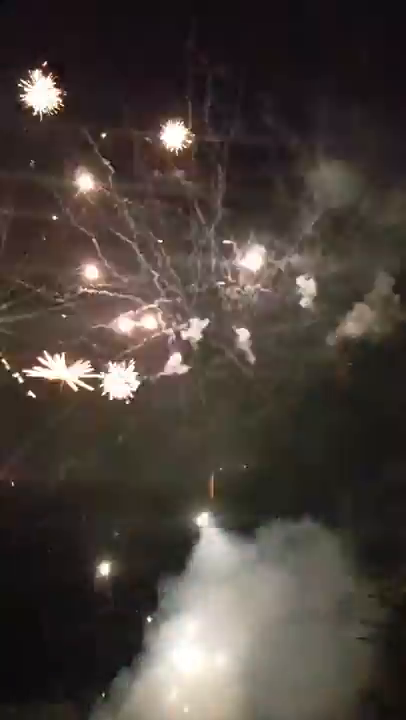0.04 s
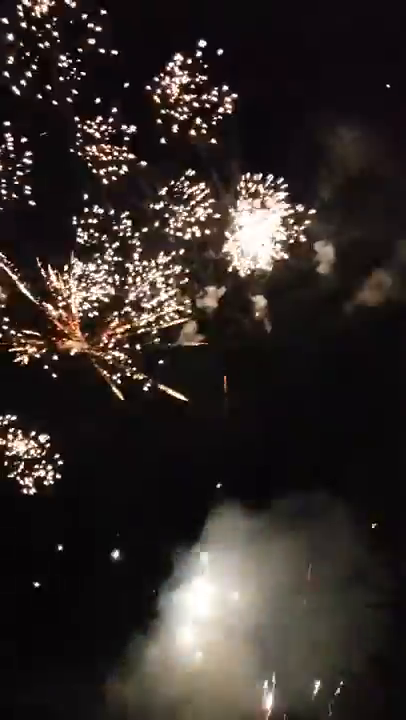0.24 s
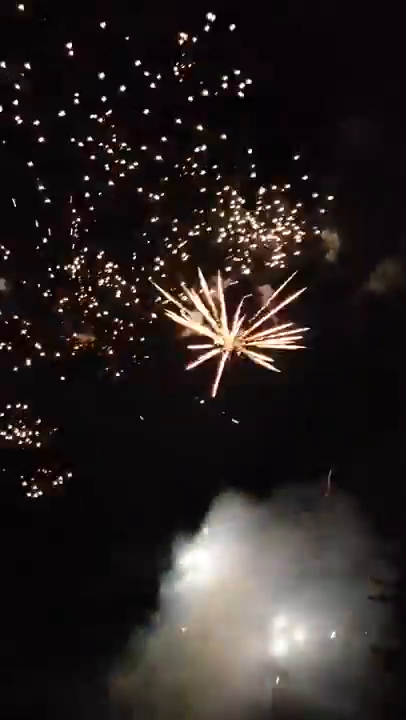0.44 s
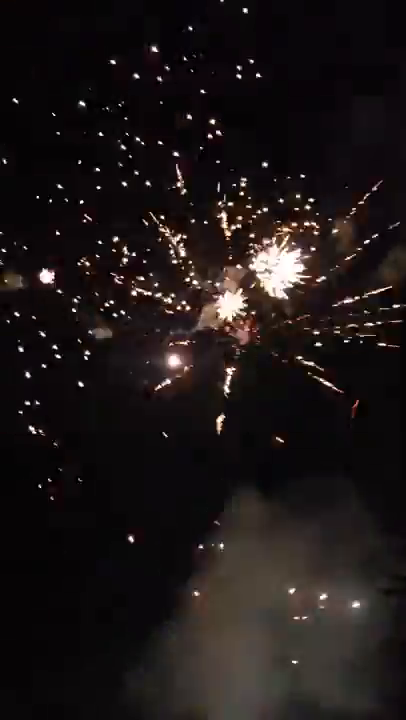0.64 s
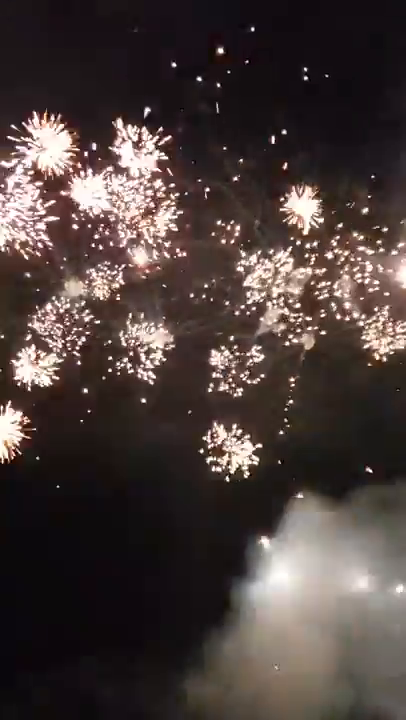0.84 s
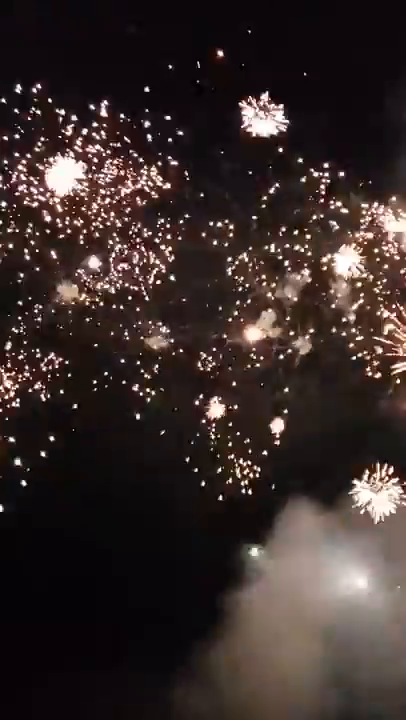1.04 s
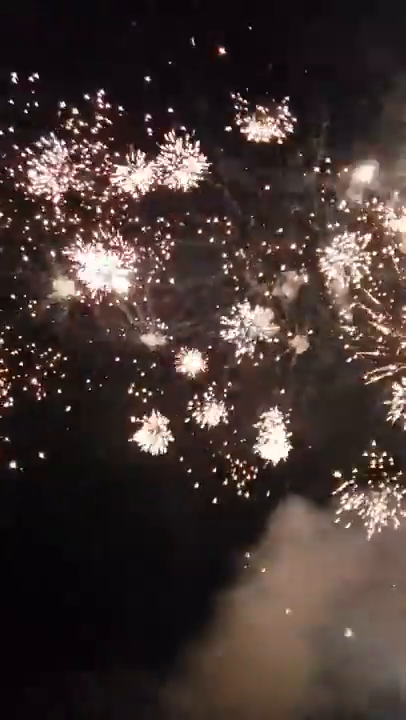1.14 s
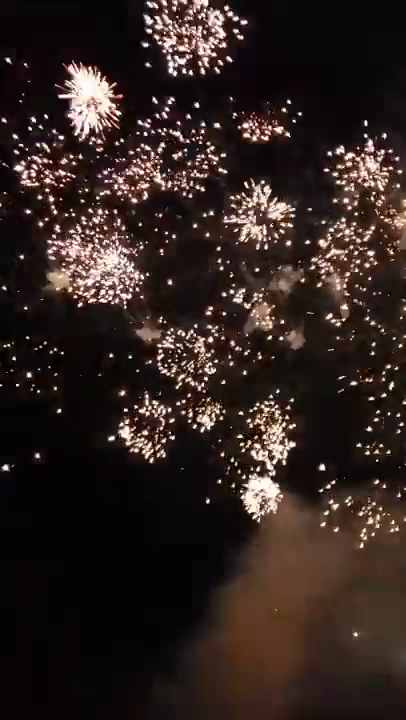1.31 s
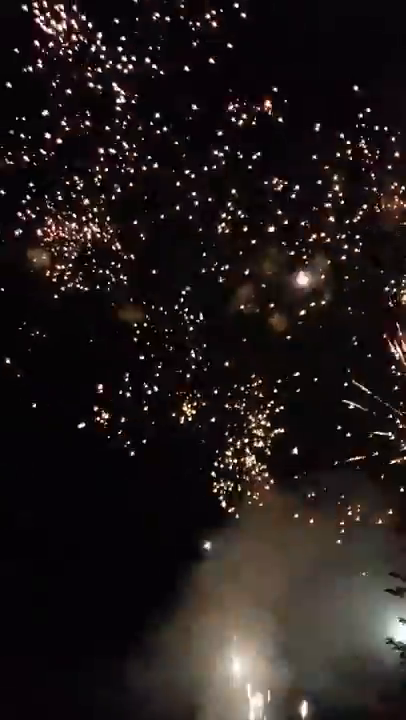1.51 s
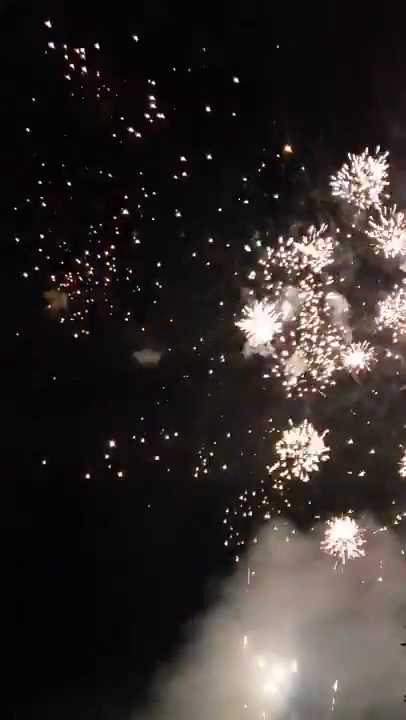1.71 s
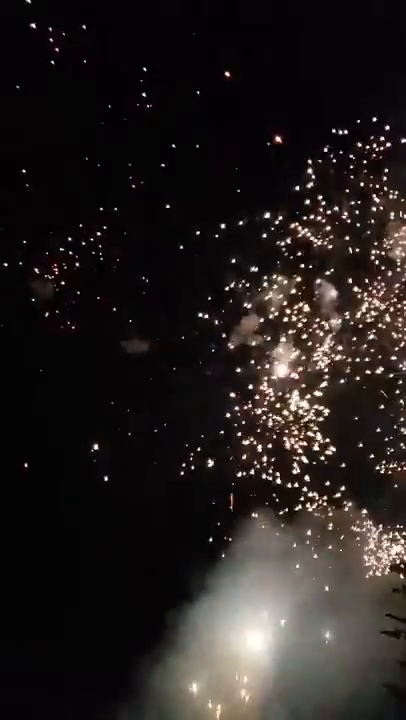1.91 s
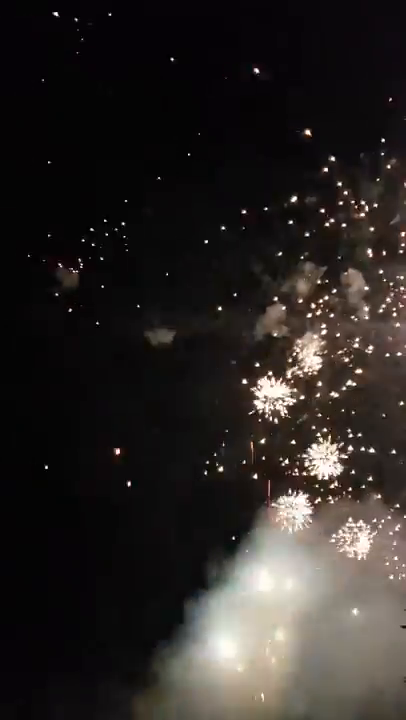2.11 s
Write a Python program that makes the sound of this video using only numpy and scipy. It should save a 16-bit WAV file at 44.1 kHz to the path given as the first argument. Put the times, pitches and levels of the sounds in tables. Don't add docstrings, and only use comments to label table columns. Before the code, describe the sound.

Aerial fireworks outdoors, close and loud on a phone microphone; big shells crack four times, each tail rumbling away in lumpy echoes, while small stars snap in quick flurries over far crackle and faint air hiss.

```python
import sys
import numpy as np
from scipy import signal
from scipy.fft import rfft, irfft
from scipy.io import wavfile
from scipy.ndimage import uniform_filter1d

SR = 44100
rng = np.random.default_rng(int(sys.argv[2]) if len(sys.argv) > 2 else 0)


def generate_wav(sig):
    pcm = np.round(np.clip(np.atleast_2d(sig).T, -1, 1) * 32767).astype(np.int16)
    wavfile.write(sys.argv[1], SR, pcm)


def boost_factor(decibels):
    exponent = np.asarray(decibels, float) / 20
    return 10 ** exponent


N = 94815


def conv(x, h):
    return signal.fftconvolve(np.atleast_2d(x), np.atleast_2d(h), axes=1)[:, :N]


def place(times, gains):
    at = np.clip(np.asarray(times) * SR, 0, N - 2)
    i = at.astype(int)
    out = np.zeros(N)
    np.add.at(out, i, gains * (1 - at + i))
    np.add.at(out, i + 1, gains * (at - i))
    return out


def band(x, hz, octaves):
    f = np.fft.rfftfreq(x.shape[-1], 1 / SR) + 1
    bell = np.exp(-(np.log2(f / hz) / octaves) ** 2)
    y = irfft(rfft(x) * bell, x.shape[-1])
    return y / np.sqrt(np.mean(y ** 2))


def pair(x, hz):
    alike_hz, right_db = 756, 1.1
    alike = 1 / (1 + (hz / alike_hz) ** 2)
    shared = np.sqrt((1 + alike) / 2) * x[0]
    different = np.sqrt((1 - alike) / 2) * x[1]
    return shared + different * np.array([[1], [-boost_factor(right_db)]])


def lumps(rate):
    k = int(SR / rate)
    steps = np.repeat(rng.standard_normal(N // 50 + 1), k)[:N]
    return 1.25 * uniform_filter1d(steps, k)


def night():
    out = 0
    for db, hz in [(-64.5, 14000), (-74, 110)]:
        out = out + boost_factor(db) * pair(band(rng.standard_normal((2, N)), hz, .7), hz)
    return out


# (time [s], level [dB])
CRACKLE_LEVEL = [(0.0, -45), (0.39, -51), (0.6, -47), (0.77, -48.5), (0.96, -43), (1.09, -43.5),
                 (1.42, -41.5), (1.56, -46.5), (1.74, -50.5), (1.83, -39.5), (2.04, -46), (2.15, -49.5)]
# (frequency [Hz], level per Hz [dB])
CRACKLE_COLOUR = [(40, -64), (200, -16), (700, 5.5), (1370, -5.5), (2300, 0), (4700, -5), (8500, -22.5),
                  (15000, -25.5)]


def crackle():
    pops_per_s, spread_db, smear_s, flicker_db = 2500, 2.6, .0057, 2
    hit = rng.random((2, N)) < pops_per_s / SR
    grains = hit * boost_factor(spread_db * rng.exponential(size=(2, N)))
    t = np.arange(SR // 20) / SR
    grains = conv(grains, rng.standard_normal((2, len(t))) * np.exp(-t / smear_s))
    colour_hz, colour_db = np.array(CRACKLE_COLOUR).T
    out = 0
    for hz in 60 * 2 ** np.arange(0, 8.2, .5):
        db = np.interp(np.log(hz), np.log(colour_hz), colour_db)
        db = db + 10 * np.log10(hz / 1000)
        out = out + boost_factor(db + flicker_db * lumps(46)) * pair(band(grains, hz, .25), hz)
    middle = signal.sosfilt(signal.butter(4, [1500, 5500], "band", fs=SR, output="sos"), out)
    level = np.interp(np.arange(N) / SR, *np.array(CRACKLE_LEVEL).T)
    return out / np.sqrt(np.mean(middle ** 2)) * boost_factor(level)


def shock(push_ms):
    suction = .6
    u = np.arange(int(SR * .03)) / SR / (push_ms / 1000)
    return (1 - u) * np.exp(-u * suction)


# (time [s], level [dB], push length [ms], right side level [dB])
THUMP_EVENTS = [
    (0.2013, -8, 0.92, -5),
    (0.562, -22, 0.56, 2),
    (.577, -24, 0.48, 0),
    (1.1174, -20.5, 0.54, 5.5),
    (1.329, -21, 0.51, 0),
    (1.567, -22.5, 0.31, 0.2),
    (1.586, -21.5, 0.6, 1.7),
]


def thumps():
    x = 0
    for s, db, push_ms, right_db in THUMP_EVENTS:
        dull = np.convolve(shock(push_ms), np.hanning(40) / 20)
        x = x + conv(place([s], boost_factor(db)), dull) * boost_factor(np.array([[0], [right_db]]))
    return signal.sosfilt(signal.butter(2, 79.5, "high", fs=SR, output="sos"), x)


def paths(s, db, late_ms, ground_ms, ground_db, body, right_db, blur_ms):
    ground_right_early_ms = .46
    s = np.atleast_1d(s)
    g = boost_factor(np.atleast_1d(db))
    bounce = np.zeros((2, N))
    for c in range(2):
        ground_s = s + (ground_ms - c * ground_right_early_ms) / 1000
        bounce[c] += place(ground_s, g * boost_factor(ground_db))
        for ms, *side_db in body:
            vary_time, vary_db = rng.standard_normal((len(s), 2)).T
            body_s = s + ms / 1000 * (1 + .04 * vary_time)
            bounce[c] += place(body_s, g * boost_factor(side_db[c] + 2 * vary_db))
    blur = np.exp(-((np.arange(40) / SR * 1000 - blur_ms) / blur_ms * 2) ** 2)
    direct = np.array([place(s, g), place(s + late_ms / 1000, g * boost_factor(right_db))])
    return direct + conv(bounce, blur / blur.sum())


# (time [s], peak level [dB], right port
# delay [ms])
POPS_EARLY = [(0.1078, -19.0, 0.18), (0.1383, -8.0, 0.18), (0.2363, -16.0, 0.23), (0.2596, -15.0, 0.23),
              (0.2773, -17.0, -0.32), (0.3269, -17.0, 0.43), (0.3674, -11.0, 0.18), (0.5605, -10.0, -0.29),
              (0.7681, -14.0, 0.41), (0.842, -13.0, 0.11), (0.8773, -10.0, 0.16), (0.8843, -13.0, 0.16),
              (0.8934, -12.0, 0.11), (0.9062, -16.0, 0.11), (0.9129, -17.0, 0.07), (0.9212, -11.0, 0.11),
              (0.9456, -16.0, 0.07), (0.953, -14.0, 0.07), (0.9643, -13.0, -0.02), (0.9716, -18.0, 0.16),
              (0.9778, -10.0, 0.18), (0.9911, -15.0, 0.18), (0.9979, -10.0, -0.45), (1.0411, -21.0, 0.16),
              (1.0495, -15.0, 0.11), (1.0705, -16.0, 0.14)]
POPS_MIDDLE = [(1.1956, -15.0, -0.02), (1.2531, -13.0, 0.14), (1.2727, -8.0, 0.14), (1.2821, -16.0, 0.05),
               (1.3137, -13.0, 0.11), (1.3211, -11.0, 0.11), (1.3276, -9.0, 0.54), (1.3352, -12.0, 0.23),
               (1.3613, -14.0, 0.07), (1.3646, -15.0, 0.11), (1.3887, -15.0, 0.2), (1.3994, -11.0, 0.16),
               (1.4351, -21.0, 0.02), (1.5851, -14.0, -0.32)]
POPS_LATE = [(1.7325, -13.0, 0.39), (1.7587, -8.0, 0.14), (1.7866, -16.0, 0.14), (1.8023, -20.0, 0.09),
             (1.8195, -19.0, 0.07), (1.8368, -13.0, 0.23), (1.854, -14.0, 0.23), (1.8643, -13.0, 0.16),
             (1.8673, -10.0, 0.09), (1.8704, -14.0, -0.07), (1.8735, -13.0, -0.39), (1.8784, -15.0, 0.0),
             (1.8851, -12.0, 0.07), (1.8931, -15.0, 0.11), (1.9078, -18.0, 0.0), (1.9797, -18.0, -0.05),
             (1.9886, -10.0, 0.23)]
POPS_EXTRA = [
    (1.2595, -19, .36),
    (1.2888, -14, .43),
    (1.3440, -19, .15),
    (1.7773, -22, .02),
    (1.7919, -18, .36),
]
GROUP_PUSHES = [.045, .075, .045, .04]
GROUP_GAINS = [1.7, 1.37, 1.5, 4.8]
# (delay [ms], left level [dB], right level [dB])
POP_BOUNCES = [(.25, -14, -6), (2.0, -16, -4), (3.3, -18, -16)]


def pops():
    tail_db, tail_t60_s = -28.5, .068
    t = np.arange(SR // 4) / SR
    out = 0
    groups = [POPS_EARLY, POPS_MIDDLE, POPS_LATE, POPS_EXTRA]
    for group, push_ms, gain_db in zip(groups, GROUP_PUSHES, GROUP_GAINS):
        s, db, late_ms = np.array(group).T
        db = db + gain_db
        arrivals = paths(s, db, late_ms, ground_ms=6.6, ground_db=-12, body=POP_BOUNCES,
                         right_db=-2.5, blur_ms=.012)
        scatter = rng.standard_normal((2, len(t))) * boost_factor(tail_db - 60 * t / tail_t60_s)
        tail = conv(place(s, boost_factor(db)), scatter)
        out = out + conv(arrivals + tail, shock(push_ms))
    return out


# (frequency [Hz], level [dB], time to fade by 60 dB [s])
ROLL_BANDS = [(157, -22.5, 1.08), (386, -18, 1.03), (556, -10.5, 0.98), (947, -10.5, 0.98),
              (2380, -14.5, 1.08), (3980, -12.5, 0.85), (7400, -11, 0.45), (13400, -10, 0.29)]
# (time [s], level [dB], bass lean [dB], wall slap [dB], fade stretch [times])
ROLL_EVENTS = [
    (-.15, -40.5, 15, .1, 1.4),
    (.2031, -26, -0.25, 1.1, 1.47),
    (0.5317, -25.5, 1.8, 2.5, 1.53),
    (1.1166, -28, 1, 4, 1.14),
    (1.518, -26, 2.3, 4.5, 1.92),
]


def rolling_echoes():
    start_s, slap_s, slap_width_s = .0033, .05, .0095
    lump_db, lumps_per_s = 2.2, 150
    t = np.arange(N) / SR
    out = 0
    shared = lumps(lumps_per_s)
    for hz, band_db, t60 in ROLL_BANDS:
        power = 0
        for s, tail_db, bass_db, slap_db, stretch in ROLL_EVENTS:
            age = np.clip(t - s, 0, None)
            lean_db = -bass_db * np.log2(hz / 1000) / 2
            fade_db = -60 * age / t60 / stretch
            wall_db = slap_db * np.exp(-((age - slap_s) / slap_width_s) ** 2)
            rise = 1 - np.exp(-(age / start_s) ** 2)
            power = power + (rise * boost_factor(tail_db + lean_db + fade_db + wall_db)) ** 2
        swell = (shared + lumps(lumps_per_s)) / np.sqrt(2)
        env = np.sqrt(power) * boost_factor(band_db + lump_db * swell)
        out = out + env * pair(band(rng.standard_normal((2, N)), hz, .73), hz)
    return out


def blast(push_ms):
    fading = .56
    u = np.arange(int(SR * .03)) / SR / (push_ms / 1000)
    return np.cos(np.pi * u / 2) * np.exp(-u * fading)


# (time [s], ground echo delay [ms], push length [ms])
SHELL_EVENTS = [
    (.2031, 5.75, .45),
    (.5337, 6.0, .42),
    (1.1182, 6.0, .46),
    (1.5190, 5.1, .44),
]
# (peak level [dB], debris crack level [dB])
SHELL_LEVELS = [
    (-2.5, -26.5),
    (2.8, -23),
    (-2.5, -24),
    (2.1, -22.5),
]
# (delay [ms], left level [dB], right level [dB])
SHELL_BOUNCES = [(.35, -17, -7), (1.3, -13, -8), (2.0, -14, -6), (2.9, -15, -9), (4.1, -13, -14)]


def shells():
    crack_t60_s = .045
    t = np.arange(N) / SR
    out = 0
    debris = band(rng.standard_normal((2, N)), 3760, 3.0)
    for (s, ground_ms, push_ms), (db, crack_db) in zip(SHELL_EVENTS, SHELL_LEVELS):
        arrivals = paths(s, db, late_ms=.11, ground_ms=ground_ms, ground_db=-2.5, body=SHELL_BOUNCES,
                         right_db=.68, blur_ms=.11)
        crack = (t > s) * boost_factor(crack_db - 60 * abs(t - s) / crack_t60_s) * debris
        out = out + conv(arrivals, blast(push_ms)) + crack
    return out


# (frequency [Hz], width [Hz], level [dB])
PORT_PEAKS = [(590, 130, -1.5), (1348, 134, -5.5), (2230, 334, 5), (4970, 780, 5.5), (13400, 2600, 7.5)]


def ports(x):
    low_hz, top_hz, treble_db = 281, 5470, -9.5
    f = np.fft.rfftfreq(4096, 1 / SR) + 1
    db = -10 * np.log10(1 + (low_hz / f) ** 4)
    db = db + treble_db / (1 + (top_hz / f) ** 10)
    for hz, width, peak_db in PORT_PEAKS:
        db = db + peak_db * np.exp(-((f - hz) / width) ** 2)
    cep = irfft(db * np.log(10) / 20)
    cep[1:2048] *= 2
    cep[2049:] = 0
    return conv(x, irfft(np.exp(rfft(cep)))[:2048])


def scene():
    near = shells() + rolling_echoes() + pops()
    return ports(near) + thumps() + crackle() + night()


def roll_off(x):
    return signal.sosfilt(signal.butter(12, 17000, fs=SR, output="sos"), x)


def record(dry):
    drive, top_hz, headroom_db = 1.4, 16000, -.8
    soft = np.tanh(drive * dry) / np.tanh(drive)
    mix = signal.sosfilt(signal.ellip(8, .3, 50, top_hz, fs=SR, output="sos"), soft)
    return roll_off(mix * boost_factor(headroom_db))


dry = scene()
out = record(dry)
generate_wav(out)
```